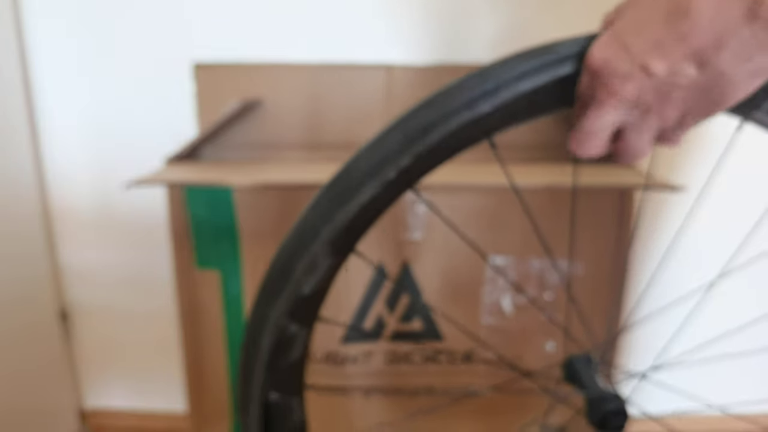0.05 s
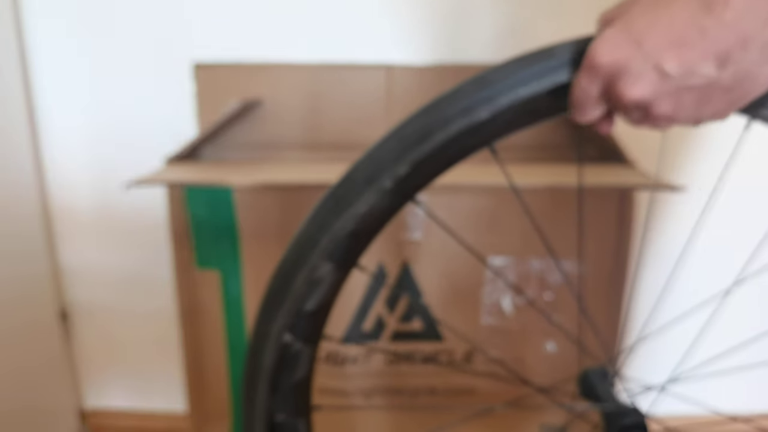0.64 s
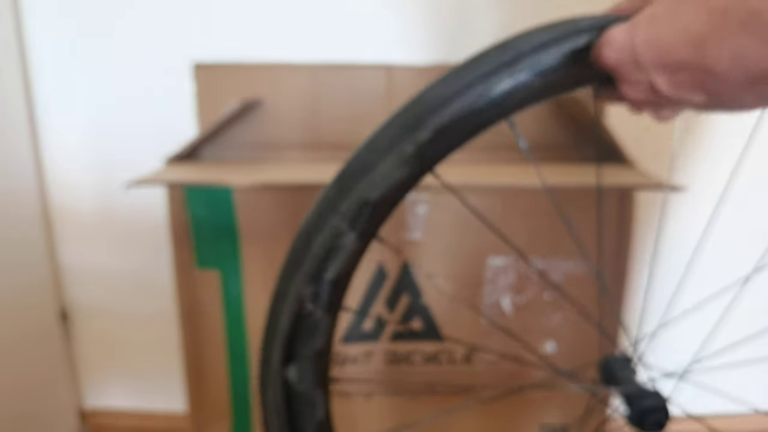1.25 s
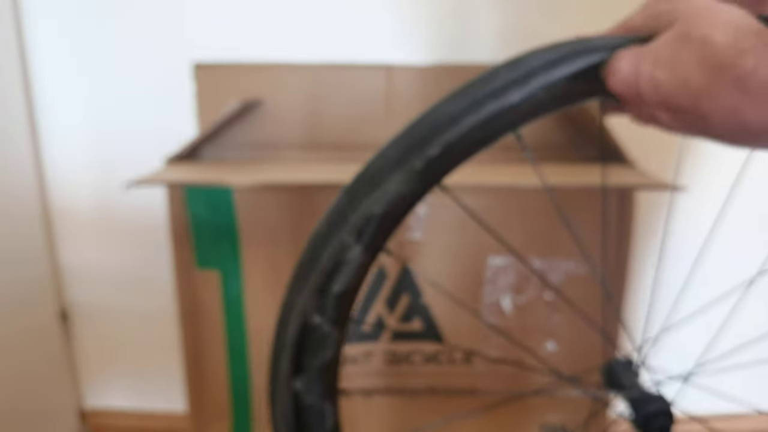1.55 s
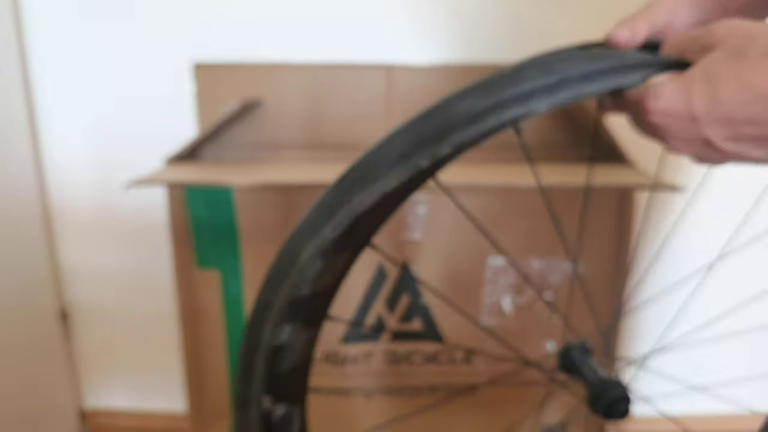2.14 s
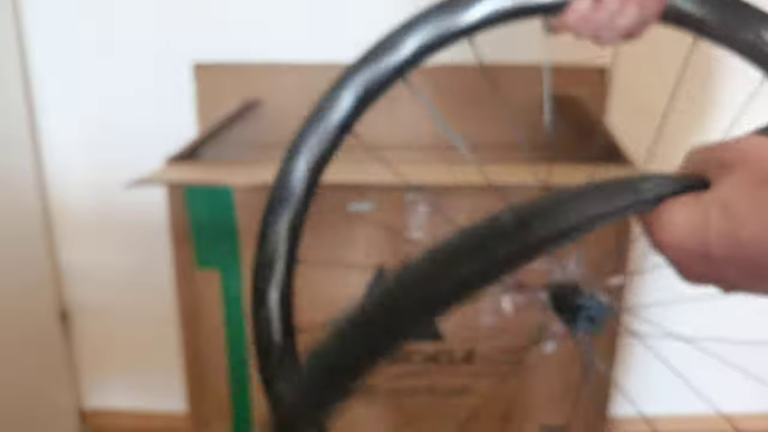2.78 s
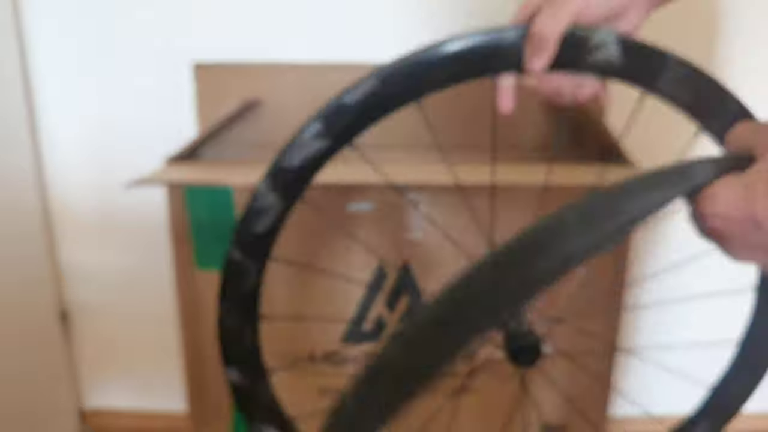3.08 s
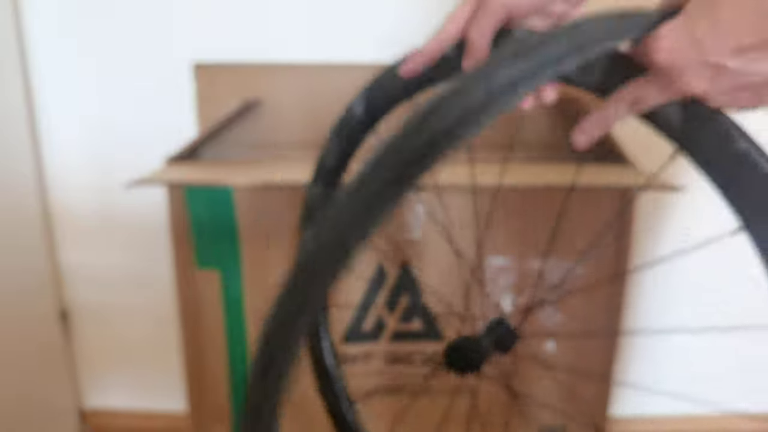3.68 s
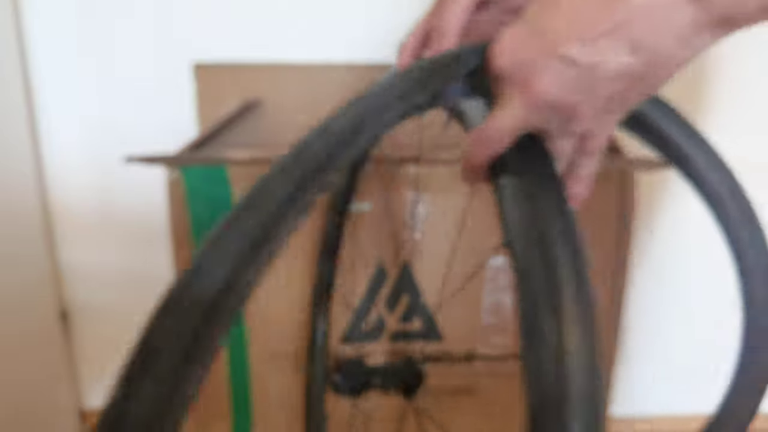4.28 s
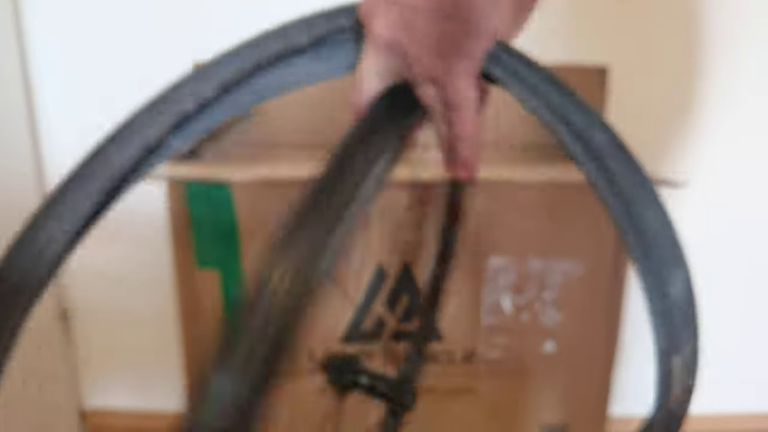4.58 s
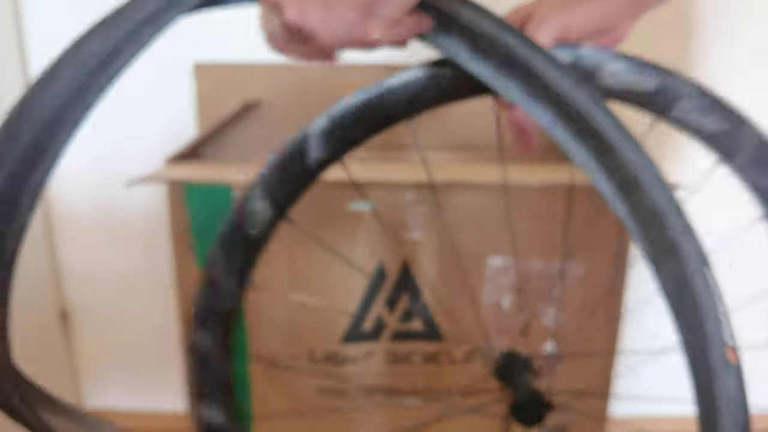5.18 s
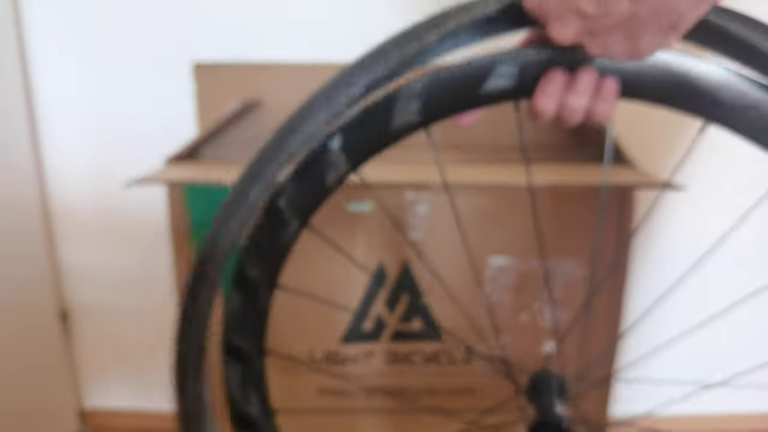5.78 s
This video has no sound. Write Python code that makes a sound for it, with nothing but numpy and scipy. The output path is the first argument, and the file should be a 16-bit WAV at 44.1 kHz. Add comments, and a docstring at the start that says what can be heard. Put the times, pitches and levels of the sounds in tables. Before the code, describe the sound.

Hands work a bicycle tyre on its rim: faint scrapes, sharp snaps, spoke pings, a squeaky juddering rub, then two loud slaps.

```python
"""A small room: a bicycle tyre is worked by hand on a carbon wheel.
The bead creaks and scrapes by stick-slip, then snaps over the hollow rim; jolted spokes ping.
The wheel bumps down on the floor, tyre and rim booming as one body. Rubber slides along the rim
in one long juddering rub, and the loose tyre slaps the rim twice. Bare walls answer."""
import sys
import numpy as np
from scipy import signal
from scipy.fft import rfft, irfft, next_fast_len
from scipy.io import wavfile
from scipy.ndimage import uniform_filter1d, map_coordinates

SR = 44100
rng = np.random.default_rng(int(sys.argv[2]) if len(sys.argv) > 2 else 0)


def output_pcm(signal):
    """Save a mono or channel-first signal as 16-bit PCM at the path in sys.argv[1].

    Samples are clipped to [-1, 1] before scaling.
    """
    pcm = np.clip(np.atleast_2d(signal).T, -1, 1) * 32767
    wavfile.write(sys.argv[1], SR, np.round(pcm).astype(np.int16))


N = 265746

# left-right likeness of a diffuse sound: freq_hz, correlation
STEREO_LIKENESS = [(60, 0.88), (200, 0.87), (400, 0.66), (800, 0.5), (1400, 0.0023), (10000, 0.0135)]
# room noise spectrum: freq_hz, density_db
AIR_SPECTRUM = [(25, -1.5), (55, 1.5), (125, -6.5), (200, -7.5), (320, -18), (460, -14), (700, -25.5),
                (1100, -23), (2200, -26.5), (4000, -30), (5800, -21), (7000, -25.5), (8200, -15.5),
                (10000, -32), (12000, -42.5), (15500, -53)]
# short rubs: full_pressure_s, attack_s, hold_s, release_s, hiss_db, shudder_db, palm_share
STROKES = [(0, 0.046, 0.022, 0.26, -66.5, -76, 0.3), (0.26, 0.25, 0.17, 0.17, -74, -67.5, 0.45),
           (1.02, 0.11, 0.11, 0.095, -62.5, -80, 0.74), (1.314, 0.043, 0.012, 0.062, -63.5, -69, 0.9),
           (1.424, .1, 0.068, 0.038, -67, -55, 0.56), (1.604, 0.14, 0.026, 0.046, -65.5, -63, 1),
           (1.78, 0.2, .15, 0.3, -64.5, -62, 0.65), (2.577, 0.062, 0.011, 0.09, -38, -39.5, 0.67),
           (2.862, 0.067, 0.0078, 0.084, -55.5, -77, 0.45), (2.935, 0.066, 0.032, 0.53, -62, -63, 0.1),
           (3.135, 0.034, 0.016, 0.074, -48, -64, 0.35), (3.629, 0.041, 0.023, 0.06, -51.5, -58, 0.08),
           (3.694, 0.012, 0.068, 0.11, -45.5, -49, 0.11), (4.807, 0.22, 0.04, 0.12, -53, -79, 0.19),
           (4.938, 0.12, 0.098, 0.53, -61.5, -71, 0.3), (5.33, 0.024, .02, 0.35, -60.5, -79, 0.18)]
# long drag of the tyre along the rim: time_s, hiss_db, shudder_db
DRAG = [(3.82, -81, -47), (3.99, -62.5, -55.5), (4.09, -52, -53.5), (4.22, -47, -49), (4.29, -42.5, -34),
        (4.35, -46, -38), (4.39, -39, -34), (4.51, -39.5, -27.5), (4.61, -55, -39.5), (4.72, -65, -86)]
# spectra of bead on rim, palm on casing and shaken wheel: freq_hz, density_db
BEAD_SPECTRUM = [(200, -37), (800, -14.5), (1700, -14.5), (2200, -13), (3000, -6.5), (3900, -7.5),
                 (5000, 0), (6100, 3), (7300, -3), (8800, -4.5), (10800, -7.5), (12000, -33.5),
                 (14800, -35), (16000, -48)]
PALM_SPECTRUM = [(300, -27.5), (1000, -4.5), (1650, 1), (2100, -4.5), (2700, -4), (3900, -8), (5900, 1),
                 (7300, -6), (9800, -7), (12000, -27), (16000, -31)]
SHUDDER_SPECTRUM = [(25, -63), (55, -14.5), (70, 10), (100, -5.5), (140, -1.5), (200, 0.5), (260, -9.5),
                    (420, -9.5), (540, -19.5), (650, -22.5), (1000, -33.5), (2500, -63.5), (8000, -49)]
# bead hits on the rim: start_s, clack_db, thud_db, crack_db, tilt_db_per_octave
SNAPS = [(0.072, -55.5, -66, -53, 0), (0.393, -60.5, -77, -59, -8.5), (1.247, -63, -70, -57.5, -9),
         (1.498, -70, -54, -56.5, -14.5), (1.645, -59, -56, -60, -9.5), (1.709, -51.5, -57, -49.5, -9),
         (1.815, -56, -59, -58, -10), (2.564, -51, -40, -47, -5), (2.573, -54, -35, -35, -1),
         (2.63, -25, -39, -28, 4.5), (2.6324, -25, -43.5, -55, 1), (2.761, -47, -41, -57, -12),
         (2.798, -51, -45, -59, -9.5), (3.368, -29, -40.5, -36, 1), (3.381, -30, -39, -35, 5.5),
         (3.693, -60, -33, -40.5, -1), (3.702, -53, -37, -56, -14), (3.884, -43, -45.5, -76, -19.5),
         (3.939, -42, -56, -78, -17.5), (4.674, -46, -60, -52, -8.5), (4.877, -52.5, -60, -46, -1),
         (5.323, -56.5, -83, -42, 14.5), (5.513, -51.5, -51.5, -56.5, -13),
         (5.6363, -20.5, -34, -16.5, 1.5), (5.6743, -23.5, -39, -30, -8), (5.687, -21, -29, -18, 7.5),
         (5.696, -29, -35, -56, -4), (5.707, -29.5, -37, -60, -12), (5.803, -38, -40.5, -63, -18)]
# spectra of rim clack, casing thud and edge crack: freq_hz, density_db
CLACK_SPECTRUM = [(300, -43), (900, -15.5), (1300, -7), (1550, -9), (1750, -4), (2100, -8.5), (2650, -5),
                  (3050, -3), (3500, -13.5), (5000, -13.5), (9000, -45), (14000, -100)]
THUD_SPECTRUM = [(40, -33), (70, -41), (120, -8), (200, -2.5), (320, 1), (500, -5.5), (750, -14),
                 (1200, -32.5), (3000, -54), (8000, -100)]
CRACK_SPECTRUM = [(1500, -22), (3400, -22), (4100, -0.5), (4500, 3), (5100, 0.5), (5800, 9.5), (6600, -1.5),
                  (7400, -7.5), (8400, -9.5), (10500, -20), (12000, -54), (15500, -75)]
# squeals of sliding rubber: peak_s, length_s, start_hz, end_hz, level_db
SQUEALS = [(0.394, .045, 1340, 1517, -64.5), (1.083, 0.2, 1626, 1722, -71.5),
           (2.58, 0.045, 5930, 6400, -43), (2.598, 0.042, 1790, 1876, -54), (4.098, 0.12, 934, 867, -52),
           (4.217, 0.089, 1420, 1755, -55), (4.285, 0.1, 2716, 3080, -42), (4.349, 0.13, 2988, 3190, -35.5),
           (4.327, 0.087, 6000, 6400, -38), (4.395, .06, 5430, 5780, -35.5),
           (4.47, 0.037, 8600, 9200, -40.5), (4.509, 0.062, 5600, 8100, -28.5),
           (4.559, 0.025, 8220, 8730, -27)]
# spoke jolts, wheel bumps, finger flicks: start_s, level_db, centre_hz, spread_octaves, longest_t60_s
PINGS = [(1.816, -48, 1700, 0.087, 0.16), (2.632, -42, 1640, 0.29, 0.39), (3.371, -46.5, 2100, 0.49, 0.92),
         (3.376, -58.5, 1176, .05, 1), (3.381, -51, 1457, 0.045, 0.94), (3.881, -40, 1368, 0.029, 0.45),
         (3.937, -42.5, 1380, 0.41, 0.3), (5.638, -44, 2500, 0.26, .6), (5.675, -32, 1250, 0.16, 0.35),
         (5.688, -30.5, 1770, 0.11, 0.59), (5.688, -38.5, 2270, 0.14, 0.83),
         (5.695, -29.5, 1280, 0.27, 0.7)]
BUMPS = [(2.57, -46.5, 247, 0.56, 1), (3.372, -42.5, 344, 0.2, 0.46), (3.693, -35.5, 460, 0.6, 0.28),
         (3.697, -30, 142.5, 0.51, 0.54), (3.722, -27.5, 67, 0.36, 0.35), (4.365, -32, 300, 0.65, 0.32),
         (4.385, -28.5, 205, 0.14, .25), (4.432, -35.5, 322, 0.29, 0.43), (4.47, -35, 90, .5, .25),
         (4.492, -30, 430, 0.13, 0.21), (4.497, -18.5, 214, 0.11, 0.17), (4.552, -37.5, 480, 0.54, 0.37),
         (4.568, -29.5, 214, 0.11, 0.17), (4.595, -33.5, 72, 0.79, 0.25), (5.637, -30.5, 390, 0.47, 0.21),
         (5.693, -22, 285, 0.14, 0.096), (5.695, -26.5, 532, 0.29, 0.18), (5.697, -32.5, 141, 0.26, 0.2),
         (5.803, -37, 180, .4, 0.082)]
FLICKS = [(3.139, -37.5, 4600, 1.12, 1), (3.157, -43.5, 3680, 1.8, 0.91), (3.198, -49, 2220, 0.42, 1)]
# modes of the laced wheel and of one spoke with its neighbours: pitch_hz, level_db, t60_share
SPOKE_MODES = [(910, -10, .25), (1110, 0, .4), (1147, -4, .7), (1184, -3, 1), (1320, 4, .42),
               (1367, -4, .55), (1400, -9, .8), (1464, -14, 1), (1702, 1, .25), (1765, -2, .38),
               (1830, -5, .62), (1884, -7, .6), (1912, -5, .55), (2202, -3, .58), (2270, -3, .55),
               (2283, -2, .68), (2330, -6, .5), (2541, -7, .45), (2724, -4, .42), (2837, -1, .42),
               (2930, -5, .38), (3176, -4, .28)]
FLICK_MODES = [(1110, -15, .6), (1190, -16, 1), (1660, -16, .35), (1830, -12, .4), (1884, -4, .7),
               (1916, -7, .55), (2270, -9, .35), (2335, -5, .4), (2363, -4, .45), (2697, -9, .35),
               (2907, -8, .25), (3612, -8, .28), (4660, -5, .16), (4850, -3, .2), (6040, -1, .15),
               (6616, -1, .13), (7300, -9, .09)]
# modes of tyre and wheel as one body and of the hollow rim: pitch_hz, level_db
BODY_MODES = [(66, -3), (78, -5), (98, -6), (120, -4), (152, -4), (199, 0), (222, -5), (300, -3), (371, -8),
              (421, -3), (511, -8), (636, -10)]
RIM_MODES = [(1320, -3), (1702, -1), (1765, -2), (2094, -4), (2516, 0), (2605, 0), (2705, -1), (2830, 0),
             (2993, 0), (3182, -3), (4450, -5), (5730, -2), (5977, -3)]
# room decay: freq_hz, t60_s
ROOM_DECAY = [(80, 0.68), (300, 0.36), (1000, 0.61), (2300, 0.38), (3800, 0.37), (6000, 0.28),
              (12000, 0.36)]


def amp(db):
    return 10 ** (np.asarray(db) / 20)


def unit_rms(x):
    return x / np.sqrt(np.mean(x ** 2) + 1e-20)


def lookup(table, hz):
    """Interpolate on a log frequency axis."""
    freq_hz, values = np.transpose(table)
    return np.interp(np.log(hz + 1), np.log(freq_hz + 1), values)


def fade(t, t60_s):
    return np.exp(-np.log(1000) * t / t60_s)


def add(track, start_s, sound):
    part = track[:, round(start_s * SR):][:, :sound.shape[1]]
    part += sound[:, :part.shape[1]]


def filtered(x, response):
    """Zero-phase filter with gain response(hz)."""
    size = next_fast_len(x.shape[-1] + 4096)
    return irfft(rfft(x, size) * response(np.fft.rfftfreq(size, 1 / SR)), size)[..., :x.shape[-1]]


def coloured(x, spectrum, size=4096):
    """Minimum-phase filter with the given spectrum."""
    gain = amp(lookup(spectrum, np.fft.rfftfreq(size, 1 / SR)))
    cepstrum = irfft(np.log(gain))
    cepstrum[1:size // 2] *= 2
    cepstrum[size // 2 + 1:] = 0
    impulse = irfft(np.exp(rfft(cepstrum)))
    return signal.fftconvolve(x, impulse[None], axes=1)[:, :x.shape[1]]


def diffuse(pair):
    """Mix two unrelated signals to stereo, alike in the bass only."""
    angle = lambda hz: np.arccos(lookup(STEREO_LIKENESS, hz)) / 2
    mid, side = filtered(pair, lambda hz: np.array([np.cos(angle(hz)), np.sin(angle(hz))]))
    return np.array([mid + side, mid - side])


def wobble(rate_hz):
    """Smooth random curve."""
    knots = rng.standard_normal(int(N * rate_hz / SR) + 4)
    return map_coordinates(knots, [np.arange(N) * rate_hz / SR])


def background(rumble_db=-1, swing_db=2):
    """Wavering room rumble under a thin steady hiss."""
    air = amp(-58.5) * unit_rms(coloured(diffuse(rng.standard_normal((2, N))), AIR_SPECTRUM))
    rumble = filtered(air, lambda hz: 1 / (1 + (hz / 250) ** 4))
    hiss = air - rumble
    return hiss + rumble * amp(rumble_db + swing_db * wobble(29))


def friction():
    """Envelopes of bead hiss, palm swish and wheel shudder, driven by the drag and the strokes."""
    t = np.arange(N) / SR
    drag_s, *drag_db = np.transpose(DRAG)
    bead, shake = amp([np.interp(t, drag_s, db, left=-120, right=-120) for db in drag_db])
    palm = np.zeros(N)
    for full_s, attack_s, hold_s, release_s, hiss_db, shudder_db, palm_share in STROKES:
        decades_down = np.maximum((full_s - t) / attack_s, (t - full_s - hold_s) / release_s)
        pressure = 10 ** -np.clip(decades_down, 0, 10)
        bead += pressure * amp(hiss_db) * np.sqrt(1 - palm_share)
        palm += pressure * amp(hiss_db) * np.sqrt(palm_share)
        shake += pressure * amp(shudder_db)
    return bead, palm, shake


def judder(rate_hz=124.8, wander=0.25):
    """Running count of stick-slip cycles: rubber catches and lets go unevenly."""
    return np.cumsum(rate_hz * np.exp(wander * wobble(45))) / SR


def slips(rate_hz, scatter_db):
    """Tiny releases of uneven size at random moments."""
    sizes = rng.standard_normal((2, N)) * amp(scatter_db * rng.standard_normal(N))
    return diffuse(sizes * (rng.random(N) < rate_hz / SR))


def patchy(x, depth_db, size=512):
    """The contact patch keeps changing: brief resonances come and go."""
    frames = signal.stft(x, nperseg=size)[2]
    field = uniform_filter1d(rng.standard_normal(frames.shape[1:]), size=4, axis=0)
    field = uniform_filter1d(field, size=9, axis=1)
    return signal.istft(frames * amp(depth_db * unit_rms(field)), nperseg=size)[1][:, :N]


def rub(envelope, spectrum, grain_db, gain_db=3.5):
    """Fine slips hiss along rim or casing."""
    hiss = coloured(slips(rate_hz=15000, scatter_db=0.5), spectrum)
    hiss = patchy(hiss, depth_db=4.5, size=768)
    return unit_rms(hiss) * envelope * amp(gain_db + grain_db * wobble(70))


def rasp(cycles, depth=0.27):
    """Rubbing is loudest just after each release."""
    return unit_rms(1 + depth * np.sin(2 * np.pi * cycles))


def shudder(envelope, cycles, gain_db=-5, scatter_db=4, stray_db=-5):
    """Each release kicks the wheel; stray coarse slips fall between."""
    kicks = np.diff(np.floor(cycles), prepend=0) * amp(scatter_db * rng.standard_normal(N))
    drive = unit_rms(kicks) + amp(stray_db) * unit_rms(slips(rate_hz=730, scatter_db=2.5))
    return unit_rms(coloured(drive, SHUDDER_SPECTRUM)) * envelope * amp(gain_db)


def blow(spectrum, tilt_db_per_octave, rise_s, lag_ms, hit_t60_s, body_t60_s, body_db, size=6144):
    """One contact: a brief burst and a dense damped ring; rms 1 if packed into 5 ms."""
    t = np.arange(size) / SR
    envelope = (fade(t, hit_t60_s) + amp(body_db) * fade(t, body_t60_s)) * (1 - np.exp(-t / rise_s))
    burst = diffuse(rng.standard_normal((2, size))) * envelope
    burst[0] = np.interp(t - lag_ms / 1000, t, burst[0], left=0)
    tilted = [(hz, db + tilt_db_per_octave * np.log2(hz / 1000)) for hz, db in spectrum]
    return unit_rms(coloured(burst, tilted, size=2048)) * np.sqrt(.005 * SR / size)


def snaps(hard_rise_s=0.0006):
    """The bead lets go and strikes: rim clacks, casing thuds, edge cracks."""
    out = np.zeros((2, N))
    for start_s, clack_db, thud_db, crack_db, tilt in SNAPS:
        rise_s = hard_rise_s * amp(-.18 * (max(clack_db, crack_db) + 19))  # light hits land softly
        clack = blow(CLACK_SPECTRUM, tilt, rise_s,
                     lag_ms=.24, hit_t60_s=.02, body_t60_s=.08, body_db=-5)
        thud = blow(THUD_SPECTRUM, 0, hard_rise_s,
                    lag_ms=.025, hit_t60_s=.014, body_t60_s=.11, body_db=-3.5)
        crack = blow(CRACK_SPECTRUM, tilt, rise_s / 2,
                     lag_ms=.1, hit_t60_s=.009, body_t60_s=.08, body_db=-13)
        add(out, start_s, amp(clack_db) * clack + amp(thud_db) * thud + amp(crack_db) * crack)
    return out


def squeals(relative_width=.17, arch_power=.99):
    """Slips fall nearly into step: the rub narrows to a hoarse gliding band."""
    out = np.zeros((2, N))
    for peak_s, length_s, start_hz, end_hz, level_db in SQUEALS:
        progress = np.linspace(0, 1, int(length_s * SR))
        pitch_hz = start_hz + (end_hz - start_hz) * progress
        phase = 2 * np.pi * np.cumsum(pitch_hz) / SR
        # faster slipping stays in step for fewer cycles
        width_hz = 2 * relative_width * pitch_hz * (pitch_hz / 5000) ** .3
        position = np.cumsum(width_hz) / SR
        stray = lambda: map_coordinates(rng.standard_normal(2048), [position], mode="wrap")
        band = np.array([stray() * np.sin(phase) + stray() * np.cos(phase) for _ in range(2)])
        band = patchy(band, depth_db=5)[:, :len(phase)]
        arch = np.abs(np.sin(np.pi * progress)) ** arch_power
        add(out, peak_s - length_s / 2, unit_rms(band) * amp(level_db) * arch)
    return out


def rings(jolts, modes, rise_s, vary_db, waver_rad, stereo_rad, beating=0):
    """Each jolt rings the modes near its centre most; they waver as the wheel is handled."""
    out = np.zeros((2, N))
    hz, mode_db, t60_share = np.transpose(modes)
    knots_s = np.arange(40) / 40
    for start_s, level_db, centre_hz, spread_octaves, t60_s in jolts:
        t = np.arange(int(.75 * t60_s * SR)) / SR
        gain = amp(mode_db + vary_db * rng.standard_normal((2, len(hz))))
        gain /= 1 + (np.log2(hz / centre_hz) / spread_octaves) ** 4
        gain /= np.linalg.norm(gain) / 2
        offset = np.pi * rng.standard_normal(len(hz)) + stereo_rad * rng.standard_normal((2, len(hz)))
        walks = rng.standard_normal((len(hz), len(knots_s))).cumsum(1)
        drift = np.array([np.interp(t, knots_s, walk) for walk in walks])
        phase = 2 * np.pi * hz[:, None] * t + waver_rad * drift
        decay = fade(t, t60_s * t60_share[:, None])
        decay *= 1 + beating * np.sin(2 * drift)  # stands for close modes beating
        sound = np.einsum("cm,mt,cmt->ct", gain, decay, np.sin(phase + offset[:, :, None]))
        add(out, start_s, amp(level_db) * sound * (1 - np.exp(-t / rise_s)))
    return out


def spoke_pings():
    """Jolted spokes ping in clusters of close notes; the tightest sing longest."""
    return rings(PINGS, SPOKE_MODES, rise_s=.0029, vary_db=1.5, waver_rad=.45,
                 stereo_rad=.9, beating=.55)


def damped(modes, exponent):
    """Append t60_share: higher modes die sooner."""
    return [(hz, db, (modes[0][0] / hz) ** exponent) for hz, db in modes]


def bumps():
    """Tyre and rim boom together when the wheel meets the floor or the rubber catches."""
    modes = damped(BODY_MODES, exponent=.41)
    return rings(BUMPS, modes, rise_s=.0044, vary_db=1, waver_rad=.56, stereo_rad=.058)


def rim_ring(hard_db=-38, ring_db=-10, centre_hz=2700, spread_octaves=1.2, t60_s=.22):
    """Each hard clack leaves a short ring in the rim wall."""
    jolts = [(start_s, clack_db + ring_db, centre_hz, spread_octaves, t60_s)
             for start_s, clack_db, *_ in SNAPS if clack_db > hard_db]
    modes = damped(RIM_MODES, exponent=1)
    return rings(jolts, modes, rise_s=.0013, vary_db=2.5, waver_rad=.063, stereo_rad=.45)


def spoke_flicks():
    """A finger chatters off one spoke: a bright, rough, short ting."""
    return rings(FLICKS, FLICK_MODES, rise_s=.004, vary_db=1.5, waver_rad=1.5,
                 stereo_rad=.7, beating=.8)


def room(x, delay_s=0.0049):
    """Bare walls answer, each frequency dying at its own rate."""
    noise = diffuse(rng.standard_normal((2, int(.75 * SR))))
    hz, t, frames = signal.stft(noise, SR, nperseg=256)
    tail = signal.istft(frames * fade(t, lookup(ROOM_DECAY, hz)[:, None]), SR, nperseg=256)[1]
    tail *= np.clip(np.arange(tail.shape[1]) / SR / delay_s - 1, 0, 1)
    return signal.fftconvolve(x, tail / np.linalg.norm(tail[0]), axes=1)[:, :N]


def scene():
    """Close sources; the room answers sharp contacts most."""
    bead, palm, shake = friction()
    cycles = judder()
    contacts = snaps() + rim_ring()
    sliding = (rub(bead, BEAD_SPECTRUM, grain_db=2) + squeals()) * rasp(cycles)
    sliding += rub(palm, PALM_SPECTRUM, grain_db=.3)
    ringing = spoke_pings() + spoke_flicks() + bumps() + shudder(shake, cycles)
    walls = room(amp(-6.5) * contacts + amp(-7) * sliding + amp(-14) * ringing)
    return contacts + sliding + ringing + walls + background()


def record(dry, cutoff_hz=15650):
    """Brick-wall low-pass."""
    return filtered(dry, lambda hz: hz < cutoff_hz)


dry = scene()
out = record(dry)
output_pcm(out)
```